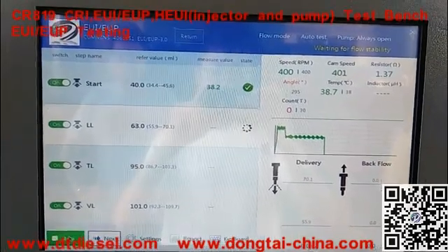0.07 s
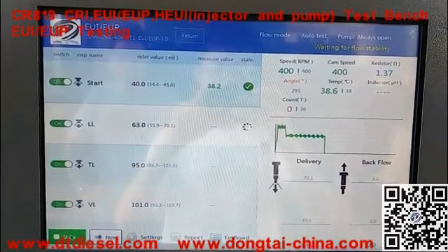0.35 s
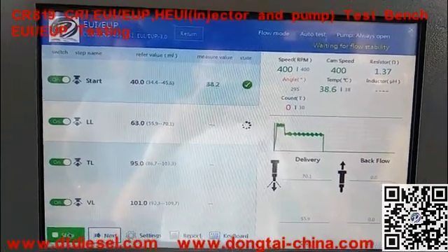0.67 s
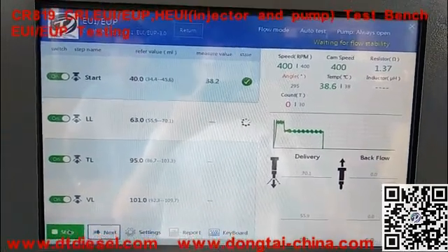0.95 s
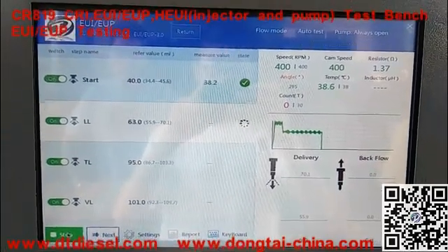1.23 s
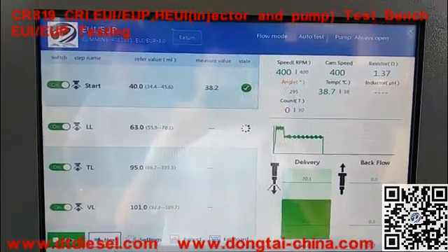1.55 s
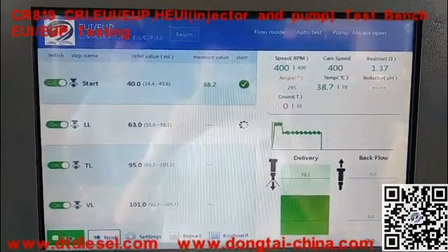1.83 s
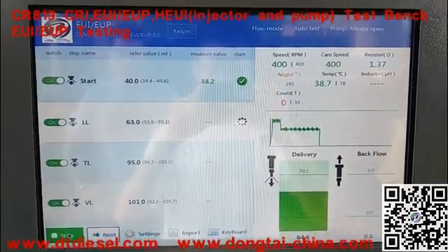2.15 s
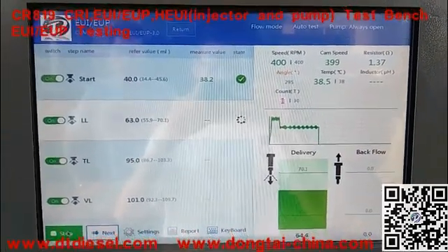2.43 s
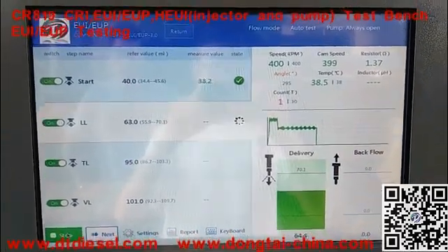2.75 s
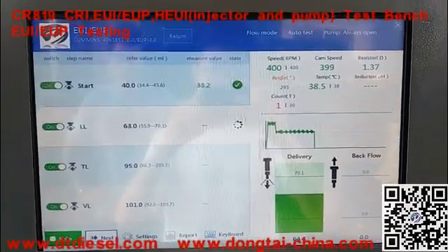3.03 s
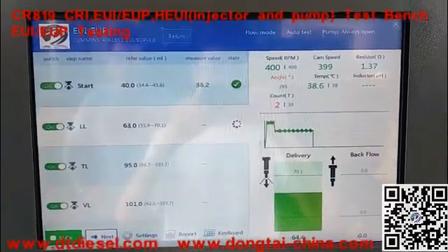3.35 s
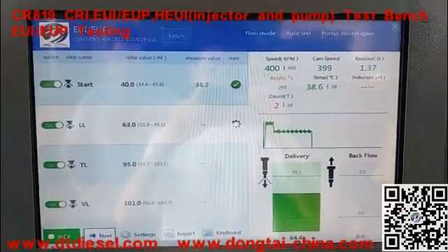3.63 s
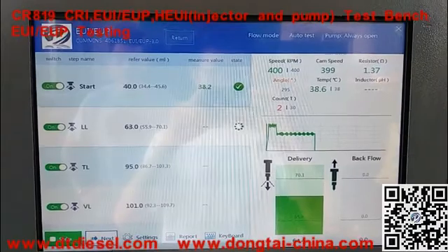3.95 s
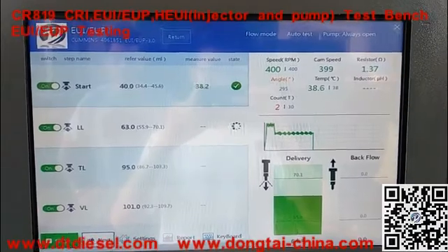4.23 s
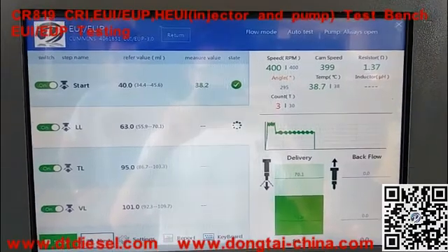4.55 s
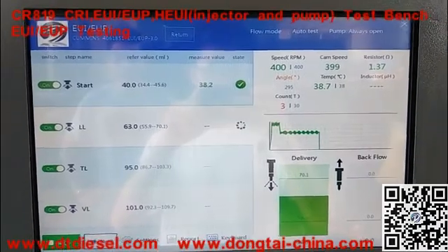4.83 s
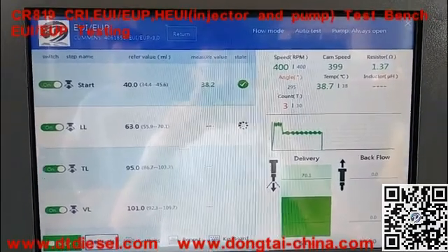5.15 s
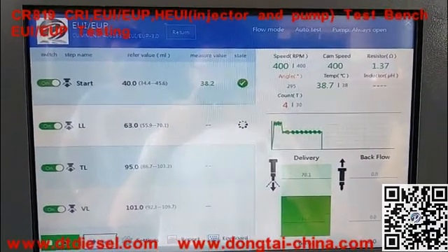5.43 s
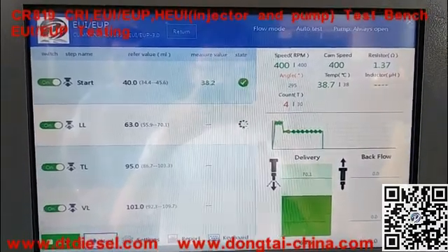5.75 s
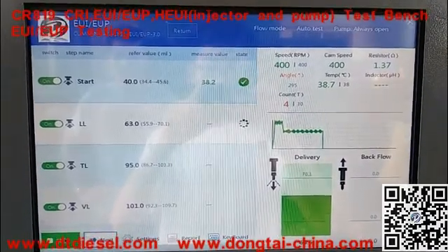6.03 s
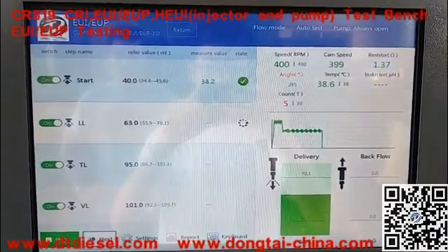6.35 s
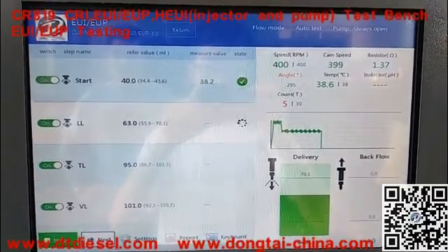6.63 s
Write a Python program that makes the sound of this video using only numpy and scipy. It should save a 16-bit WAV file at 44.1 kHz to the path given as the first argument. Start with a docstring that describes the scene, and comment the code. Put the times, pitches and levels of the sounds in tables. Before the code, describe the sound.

A fuel injector on a test bench knocks and ticks fast and evenly over a steady oil hiss and motor rumble.

```python
"""Diesel injector on a test bench

Indoors, a cam turns at about 400 rpm and pushes the injector once a turn. Each stroke gives
a quick group of hollow knocks, a rattle and a fine valve tick, and the room answers.
Test oil hisses through the lines, slowly growing louder, while the drive rumbles and hums."""
import sys
import numpy as np
from scipy import signal
from scipy.fft import rfft, irfft, next_fast_len
from scipy.io import wavfile
from scipy.ndimage import map_coordinates

SR = 44100
rng = np.random.default_rng(int(sys.argv[2]) if len(sys.argv) > 2 else 0)


def store_wav(level_fs):
    """Save 16-bit WAV to argv[1]."""
    pcm = np.round(np.clip(np.atleast_2d(level_fs), -1, 1) * 32767)
    wavfile.write(sys.argv[1], SR, pcm.T.astype(np.int16))


N = 294588


def cam():
    """The cam gives one stroke a turn. Returns their times (s) and strengths (dB)."""
    # spells when the speed governor hurries the cam on: start/s, end/s
    hurries = [(.85, 1.24), (2.35, 2.74), (3.79, 4.69), (6.33, 6.68)]
    usual_rpm, hurried_rpm, first_stroke_s = 399.12, 402.1, .0379
    t = np.arange(N) / SR
    hurried = np.any([(t >= start) & (t < end) for start, end in hurries], axis=0)
    turns = np.cumsum(np.where(hurried, hurried_rpm, usual_rpm)) / (60 * SR)
    turns -= np.interp(first_stroke_s, t, turns)
    times = np.interp(np.arange(np.ceil(turns[-1])), turns, t)
    return times, rng.normal(loc=-.5, scale=.35, size=len(times))


def knocks(strokes):
    """The plunger is loaded and let go: at each knock the housing rings for a few cycles."""
    # a stroke's knocks and their echoes off cabinet and walls: delay/s, f/Hz, level/dB, rise/s, scatter/dB
    hits = [(.0003, 905, -9.1, .0031, .5), (.0055, 1450, -25, .003, 2.5), (.0068, 931, -11.3, .0024, .5),
            (.0107, 707, -15.3, .0045, .8), (.0135, 1585, -26, .003, 2), (.016, 2030, -29, .002, 2),
            (.0168, 996, -18, .0026, 1), (.0272, 1025, -10.6, .0038, .6), (.0407, 900, -21, .0023, 1),
            (.0483, 724, -20, .0041, 1), (.054, 922, -20.5, .005, 1), (.0663, 903, -18.5, .0036, 1),
            (.0759, 862, -23, .0049, 1), (.1001, 940, -24.5, .0043, 1)]
    t = np.arange(SR // 10) / SR
    out = np.zeros(N)
    for delay, hz, db, rise, scatter_db in hits:
        ring = pulse(t / rise) * np.sin(2 * np.pi * hz * t)
        out += amp(db) * each_stroke(strokes, ring, delay, scatter_db, jitter_s=.00003)
    return out


def rattles(strokes):
    """The frame thuds, the part riding on the cam rattles, and the valve ticks shut and open."""
    # noise bursts in a stroke: delay/s, f/Hz, base width/Hz, level/dB, rise/s, time to fade 60 dB/s
    noise_bursts = [(-.014, 208, 40, -34.5, .003, .06), (-0.0025, 215, 60, -29.5, .009, 0.2),
                    (.005, 698, 210, -28.5, .0024, 0.25), (0.00053, 1380, 560, -27, 0.0072, 0.21),
                    (0.0023, 2000, 190, -33, .0049, .14), (-0.00054, 4720, 140, -26.5, .003, 0.048),
                    (-0.00087, 5720, 170, -23.5, .003, 0.065), (-0.005, 14900, 1200, -33, .008, .08),
                    (.033, 14300, 2000, -35, .004, .09)]
    t = np.arange(SR // 4) / SR
    out = np.zeros(N)
    for delay, hz, width, db, rise, fade in noise_bursts:
        shape = (1 - np.exp(-t / rise)) * amp(-60 * t / fade)
        bursts = each_stroke(strokes, shape / shape.max(), delay, scatter_db=1.1, jitter_s=.0011)
        out += amp(db) * bursts * noise(lambda f: bell(f, hz, 1.7 * width) ** 2)
    return out


def oil(strokes):
    """Oil hisses and flutters in the ringing lines; the hiss dips briefly with each stroke."""
    # tone of oil rushing through the valves: f/Hz, relative level/dB
    rush = [(800, -43), (2300, -10), (3150, -9.5), (3450, -3.5), (4150, -4), (4600, 1), (5200, -2),
            (6300, -1), (7400, -1), (9200, -4.5), (10700, -6), (12200, -11.5), (13600, -18.5), (15500, -27)]
    # pitches at which the oil lines ring: f/Hz, width/Hz, boost/dB
    pipes = [(3780, 220, 1), (4800, 190, 2.5), (5605, 71, 4.5), (6055, 77, 5), (6340, 160, 4),
             (6800, 115, 4.5), (7720, 200, 0), (8140, 180, 2.5), (8840, 100, 2), (9730, 190, 3)]
    # the slowly growing hiss: t/s, level/dB
    flow = [(0, -20), (.4, -21), (.8, -19.5), (3.4, -18.5), (6.68, -17.5)]
    dip_db, dip_rise_s = 2, .028
    t = np.arange(SR // 4) / SR
    dips = each_stroke(strokes, pulse(t / dip_rise_s), delay=-.0043, scatter_db=1.3, jitter_s=0)
    hiss = noise(lambda f: amp(along(rush, f) + sum(db * bell(f, hz, width) for hz, width, db in pipes)))
    flutter = shimmer(hiss, depth_db=.6, band_hz=900, hold_s=.07)
    level_db = curve(flow) - dip_db * dips + .35 * wobble(60)
    return amp(level_db) * shimmer(flutter, depth_db=2.5, band_hz=60, hold_s=.07)


def drive():
    """Motor and pump rumble, whir and hum, with a faint whine. The rumble and whir swell once."""
    # running noise of motor and pump: f/Hz, relative level/dB
    running_noise = [(25, -52), (60, -49), (100, -30.5), (140, -19), (175, -10), (200, -5.5), (270, -1.5),
                     (310, -4.5), (365, -2.5), (440, -6.5), (620, -7.5), (950, -2.5), (1300, -9.5),
                     (2100, -11), (4000, -26.5)]
    # hum tones of the drive: f/Hz, level/dB
    hum = [(207, -44.5), (357, -46.5), (374, -45), (496, -45.5), (699, -46), (725, -43.5)]
    # thin high whine of the drive's electronics: f/Hz, width/Hz, level/dB
    whine = [(13720, 80, -58), (14000, 95, -49.5)]
    swell_at_s, swell_half_s, whir_fade_db_per_s = 2.484, .11, 3.5
    t = np.arange(N) / SR
    swell = np.exp(-((t - swell_at_s) / swell_half_s) ** 2)
    rumble = noise(lambda f: amp(along(running_noise, f)) * (f < SR / 8))
    rumble_db = -26.5 + 2.4 * swell + .95 * wobble(7.7)
    out = amp(rumble_db) * shimmer(rumble, depth_db=3, band_hz=50, hold_s=.12)
    whir = noise(lambda f: bell(f, centre=2460, width=2700) ** 2)
    whir_db = -31.5 - whir_fade_db_per_s * t + 9.5 * swell
    out += amp(whir_db) * shimmer(whir, depth_db=5, band_hz=75, hold_s=.1395)
    for hz, db in hum:
        peak = np.sqrt(2) * amp(db + 1.1 * wobble(3.1))
        out += peak * np.sin(2 * np.pi * hz * t + .5 * wobble(2.055))
    for hz, width, db in whine:
        out += amp(db) * noise(lambda f: bell(f, hz, width))
    return out


def room(x):
    """The room answers with a late, blurred echo in which each pitch dies at its own speed."""
    # how long the room rings: f/Hz, time to fade 60 dB/s
    fade_times = [(200, 0.44), (1000, 0.27), (5000, 0.15), (15000, 0.21)]
    delay_s = .035
    hz, t, spectrum = signal.stft(rng.standard_normal(SR // 2), SR, nperseg=256)
    fade = amp(-60 * t / along(fade_times, hz)[:, None])
    tail = signal.istft(spectrum * fade, SR, nperseg=256)[1]
    delayed = np.pad(x, (round(delay_s * SR), 0))
    return signal.fftconvolve(delayed, tail / np.linalg.norm(tail))[:N]


def each_stroke(strokes, shape, delay, scatter_db, jitter_s):
    """Repeat a shape at every stroke, with a little scatter in size and time."""
    times, db = strokes
    size, slip = rng.standard_normal((len(times), 2)).T
    starts = np.round((times + delay + jitter_s * slip) * SR).astype(int)
    clicks = np.bincount(np.clip(starts, 0, N), amp(db + scatter_db * size), N + 1)[:N]
    return signal.fftconvolve(clicks, shape)[:N]


def shimmer(x, depth_db, band_hz, hold_s):
    """Make a noise shimmer: peaks and dips come and go across its pitches."""
    hz, t, spectrum = signal.stft(x, SR, nperseg=2048)
    grid = np.meshgrid(hz / band_hz, t / hold_s, indexing="ij")
    ripple = map_coordinates(rng.standard_normal(spectrum.shape), grid)
    return unit(signal.istft(spectrum * amp(depth_db * ripple), SR, nperseg=2048)[1][:N])


def noise(response):
    """Noise of strength 1, its tone shaped by the response."""
    return unit(filtered(rng.standard_normal(N), response))


def filtered(x, response):
    """Turn each frequency of x up or down by response(hz)."""
    size = next_fast_len(N + SR // 2)
    return irfft(rfft(x, size) * response(np.fft.rfftfreq(size, 1 / SR)), size)[..., :N]


def pulse(age):
    """A bump that rises to 1 at age 1, then dies away."""
    return (age * np.exp(1 - age)) ** 2


def bell(hz, centre, width):
    """A peak of height 1 around a centre frequency."""
    return 1 / (1 + (2 * (hz - centre) / width) ** 2)


def wobble(rate):
    """A smooth curve through `rate` random values a second."""
    return map_coordinates(rng.standard_normal(int(N * rate / SR) + 4), [np.arange(N) * rate / SR])


def along(points, hz):
    """Read between (f/Hz, value) points, with octaves evenly spaced."""
    f, values = np.transpose(points)
    return np.interp(np.log(hz + 1), np.log(f + 1), values)


def curve(rows):
    """One value per sample from (t/s, value) rows."""
    return np.interp(np.arange(N) / SR, *np.transpose(rows))


def amp(db):
    """Turn decibels into a multiplier."""
    return 10 ** (np.asarray(db) / 20)


def unit(x):
    """Scale to an average strength (rms) of 1."""
    return x / np.sqrt(np.mean(x ** 2) + 1e-20)


def scene():
    """The injector and its echo over the running bench, alike in both ears."""
    strokes = cam()
    injector = knocks(strokes) + rattles(strokes)
    mono = injector + amp(-14.5) * room(injector) + drive() + oil(strokes)
    return np.array([mono, mono])


def record(dry):
    """The small microphone loses the deep bass, and the very highest treble is cut off."""
    low_hz, top_hz = 75, 15750
    return filtered(dry, lambda hz: hz ** 2 / np.hypot(hz ** 2, low_hz ** 2) * (hz < top_hz))


dry = scene()
out = record(dry)
store_wav(out)
```